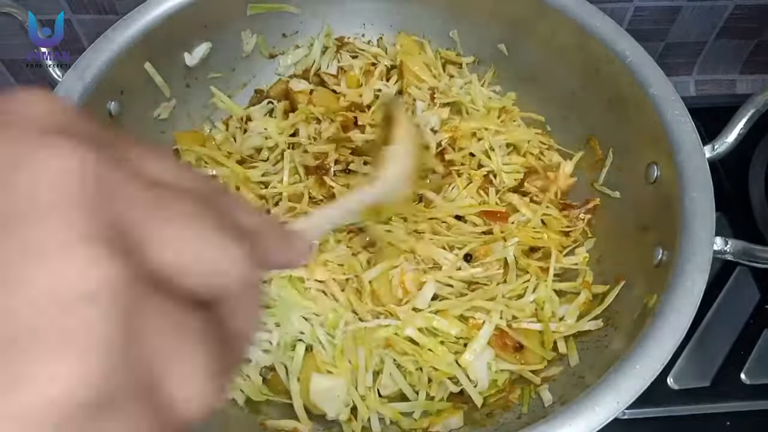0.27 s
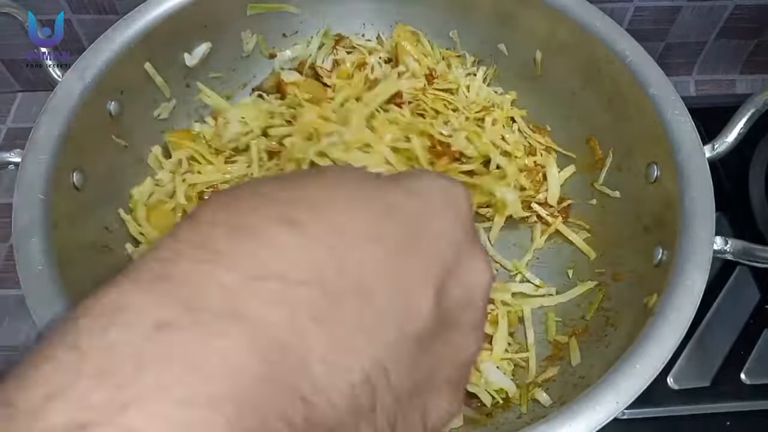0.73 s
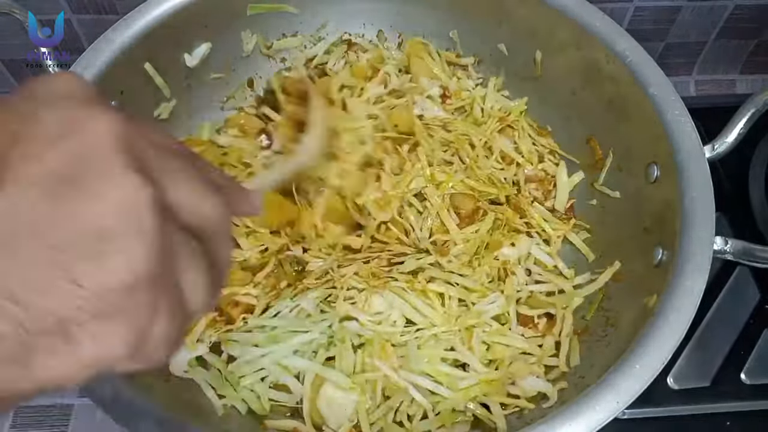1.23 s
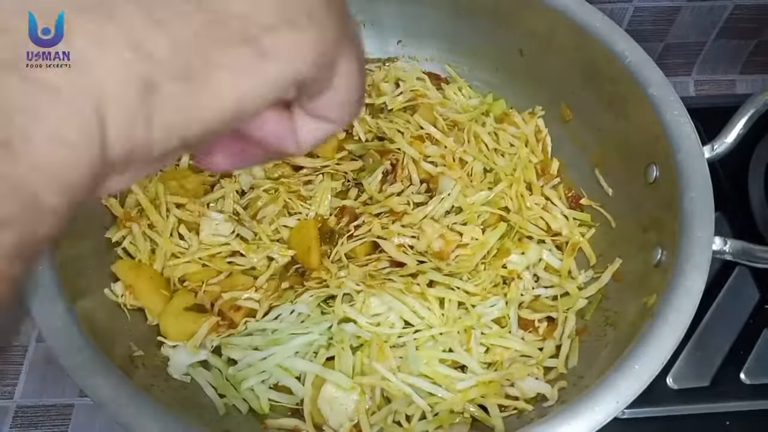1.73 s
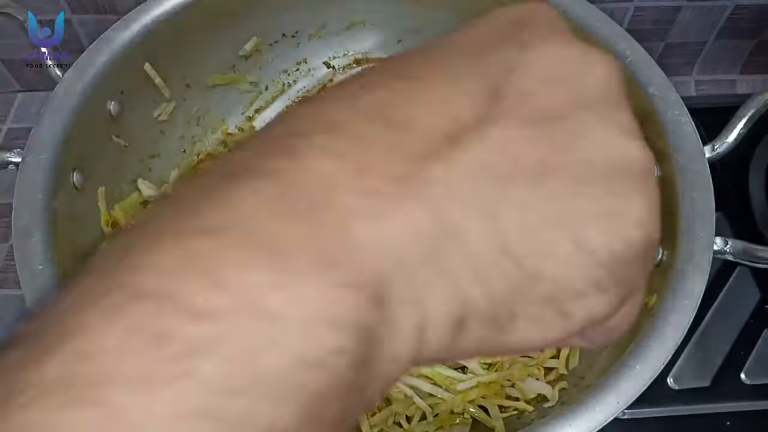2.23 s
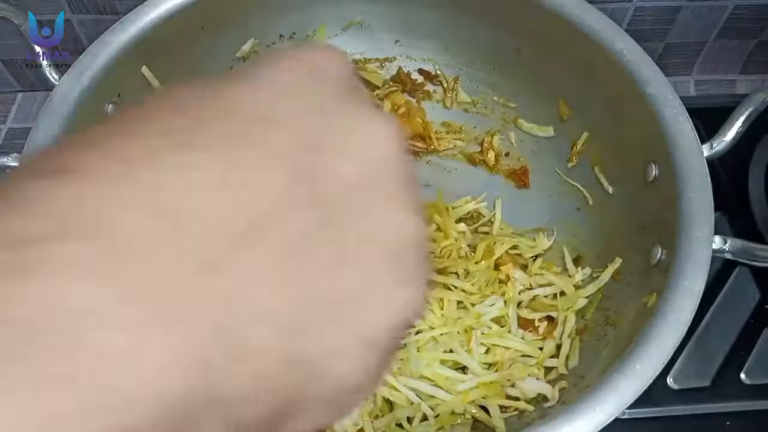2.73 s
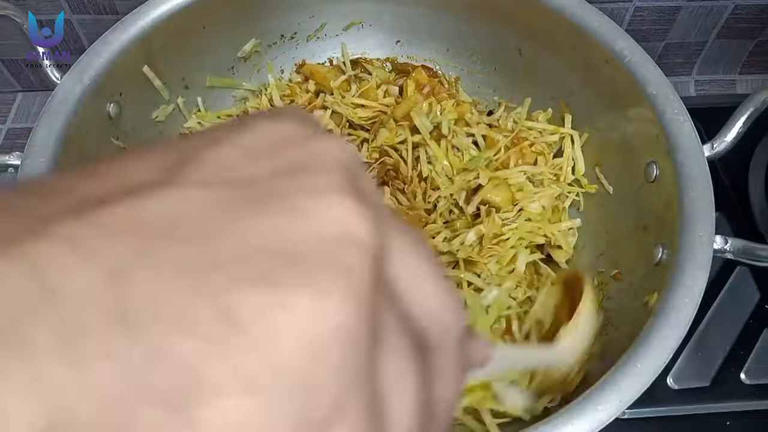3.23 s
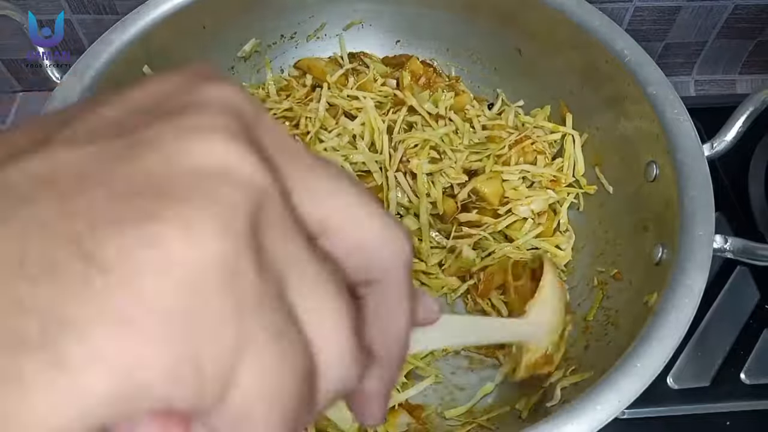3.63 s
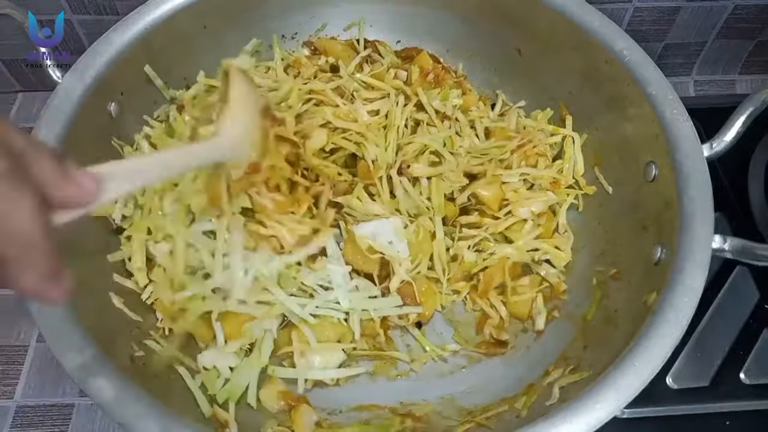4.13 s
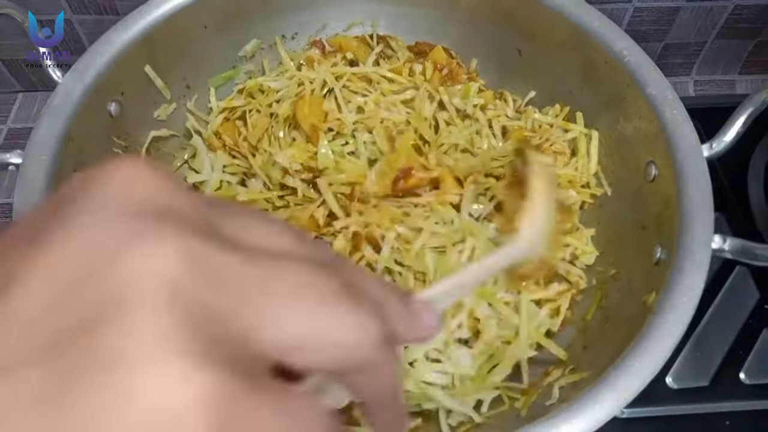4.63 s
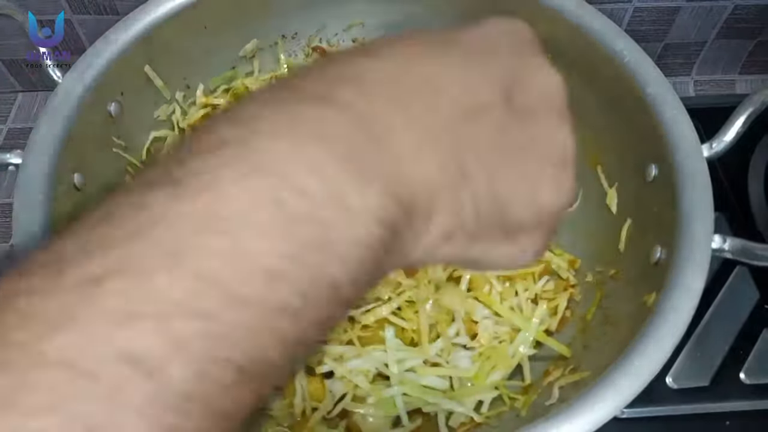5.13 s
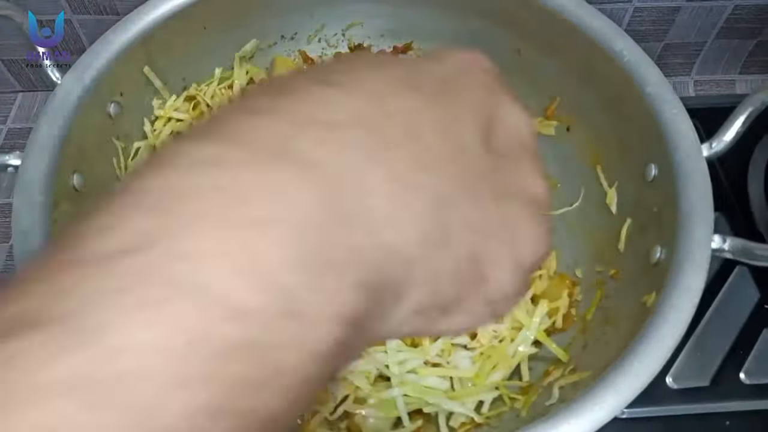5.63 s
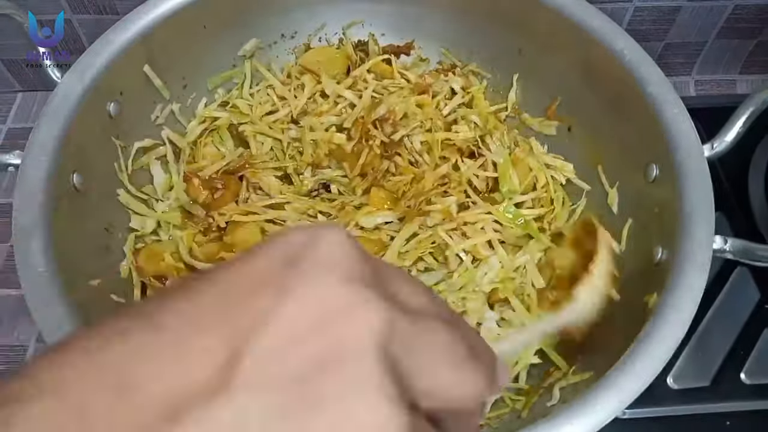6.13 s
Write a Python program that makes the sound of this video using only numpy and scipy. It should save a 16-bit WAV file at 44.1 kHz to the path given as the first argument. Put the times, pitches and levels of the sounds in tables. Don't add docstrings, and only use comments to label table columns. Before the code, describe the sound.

Close, dry wooden scraping and soft rustling of food in a metal pan, punctuated by bright clanks, small taps and dull thuds in a quiet kitchen.

```python
import sys
import numpy as np
from scipy import signal
from scipy.io import wavfile
from scipy.ndimage import uniform_filter1d

SR = 44100
rng = np.random.default_rng(int(sys.argv[2]) if len(sys.argv) > 2 else 0)


def generate_wav(signal):
    frames = np.transpose(np.atleast_2d(signal))
    scaled = np.clip(frames, -1, 1) * 32767
    pcm = np.round(scaled).astype(np.int16)
    wavfile.write(sys.argv[1], SR, pcm)


def invert_db(x):
    u = np.asarray(x, float) / 20
    return 10 ** u


N = 281954

# moment of most pressure in s, rise in s, fall in s, scrape level in dB,
# pitch of the patch of wall that sings in Hz.
STROKES = [(.03, 0.14, 0.22, -59.5, 3170), (.285, 0.093, 0.14, -59, 3040),
           (.515, 0.056, 0.048, -59.5, 3340), (1.14, 0.073, 0.06, -54, 3100),
           (1.33, 0.073, 0.13, -61.5, 4800), (1.64, 0.055, .06, -64, 4000),
           (1.748, 0.038, 0.057, -56, 2410), (2.79, 0.15, 0.16, -60.5, 3480),
           (3.045, 0.16, 0.14, -60, 2610), (3.35, 0.055, 0.087, -62.5, 7200),
           (3.46, 0.15, 0.077, -52, 4860), (3.905, 0.13, 0.078, -56.5, 5000), (3.98, 0.3, 0.097, -57, 3150),
           (4.4, 0.069, 0.092, -54, 4000), (4.625, 0.072, 0.099, -57.5, 4630),
           (4.88, 0.041, 0.12, -53.5, 4150), (4.97, 0.11, 0.13, -60.5, 4060),
           (5.39, 0.15, 0.24, -64.5, 4540), (5.59, 0.016, 0.15, -56, 6260),
           (5.66, 0.072, 0.09, -56.5, 5500), (5.78, 0.044, 0.26, -64.5, 3000),
           (6.04, 0.09, 0.16, -58, 3100), (6.28, 0.024, 0.082, -53, 5400)]
# [s, s, s, dB, Hz].
DRAGS = [
    (.825, 0.16, 0.11, -54, 3100),
    (1.0, 0.13, .1, -63.5, 4200),
    (2.03, 0.025, 0.15, -62, 3360),
    (2.08, 0.065, 0.047, -57, 2950),
    (2.43, 0.082, 0.2, -60.5, 2770),
    (2.55, 0.21, 0.18, -61.5, 4300),
    (5.18, 0.04, .1, -67, 2760),
]
# peak in s, rise in s, fall in s, level in dB.
SKIDS = [
    (.69, 0.0067, 0.018, -47),
    (2.03, 0.031, 0.03, -51.5),
    (2.08, .005, 0.055, -58),
    (2.385, 0.039, 0.032, -55.5),
    (5.14, 0.047, 0.11, -58),
]
# peak in s, rise in s, fall in s, level in dB.
TUMBLES = [(.03, 0.13, 0.11, -64.5), (.27, 0.14, 0.21, -60.5), (.75, 0.067, 0.15, -56),
           (1.11, 0.11, 0.085, -67), (1.34, .15, 0.34, -72.5), (1.75, 0.085, 0.087, -66.5),
           (2.08, 0.081, 0.13, -68.5), (2.44, 0.13, 0.21, -66), (2.89, 0.22, 0.032, -64.5),
           (2.98, 0.01, 0.055, -60.5), (3.055, 0.03, 0.032, -53), (3.4, 0.13, 0.25, -70.5),
           (3.88, 0.12, 0.017, -69), (3.95, 0.043, 0.16, -68.5), (4.1, 0.13, 0.26, -71),
           (4.39, 0.075, 0.092, -66.5), (4.62, 0.063, 0.059, -68.5), (4.92, 0.26, 0.15, -69.5),
           (5.19, 0.13, 0.053, -61), (5.39, .05, 0.17, -74), (5.6, 0.043, 0.13, -75),
           (5.69, 0.091, 0.041, -66.5), (5.77, .02, 0.081, -63.5), (5.98, 0.21, 0.068, -66.5),
           (6.055, 0.013, 0.043, -50), (6.3, 0.075, .04, -68)]
# frequency in Hz, density in dB per Hz.
SCRAPE_SPECTRUM = [(530, -44), (900, -2.5), (1230, -13.5), (1570, -13.5), (1810, -0.5), (2170, -4),
                   (2760, 1), (3590, -3.5), (5410, -1.5), (6480, 1.5), (7960, 0), (10100, -9), (14500, -10),
                   (16000, -8.5)]
# frequency in Hz, density in dB per Hz.
TUMBLE_SPECTRUM = [(71, -64), (120, -23.5), (273, 2), (484, -14), (585, 0), (658, -4.5), (1760, -4),
                   (2130, -17), (4000, -18), (5200, -34), (8800, -120)]

# start in s, slap peak in dB, crack below it in dB, crack t60 in s,
# share of the crack's tail in dB.
KNOCKS = [
    (0.678, -13, -3, 0.22, -8),
    (1.9735, -38, -29, 0.14, -17),
    (2.328, -23, -2, 0.34, -7),
    (5.0845, -16.5, -3, 0.23, -7),
]
# frequency in Hz, level in dB, t60 in s.
SLAP_MODES = [(1370, -3.5, .05), (3465, -3, .05), (4430, -1.5, .06)]
# frequency in Hz, density in dB per Hz.
CRACK_SPECTRUM = [(90, -55), (300, -10), (800, -21), (1400, -2), (2300, -2.5), (4500, -5), (5500, -9.5),
                  (6800, -17), (8000, -14), (10000, -24), (12000, -14), (16000, -34)]
PAN_HZ = [797, 1008, 1190, 1291, 1321, 1358, 1456, 1645, 1725, 2169, 2254, 2380, 2472, 2521, 2623, 2875,
          3323, 3427, 3462, 3495, 4091, 4393, 4432, 4750, 5098, 5170, 5445, 6015, 604, 832, 1157, 1555,
          3447, 3525, 5222, 5705, 7865, 8030, 8764, 10580, 11660, 13030]
# t60 in s, then level in dB in each of the four knocks.
BOWL_MODES = [(.18, -48, -64, -52, -52), (.4, -40, -76, -49, -43), (.31, -49, -77, -48, -52),
              (.24, -39, -61, -39, -43), (.24, -40, -60, -42, -43), (.28, -40, -70, -46, -42),
              (.07, -34, -59, -38, -37), (.24, -51, -66, -54, -49), (.1, -36, -64, -43, -40),
              (.13, -42, -62, -53, -46), (.19, -31, -63, -31, -30), (.24, -38, -56, -55, -41),
              (.08, -39, -47, -49, -42), (.08, -38, -48, -52, -44)]
# t60 in s, then level in dB in each knock.
RIM_MODES = [(.09, -43, -46, -48, -48), (.08, -38, -56, -45, -42), (.13, -40, -54, -47, -45),
             (.18, -41, -52, -34, -40), (.18, -28, -54, -60, -29), (.18, -41, -55, -48, -41),
             (.18, -47, -71, -57, -46), (.2, -39, -50, -51, -43), (.06, -33, -45, -46, -39),
             (.16, -50, -46, -52, -48), (.11, -39, -67, -62, -44), (.15, -42, -62, -59, -43),
             (.18, -49, -83, -71, -56), (.11, -49, -46, -65, -54)]
# t60 in s, then level in dB in each knock.
LIP_MODES = [(0.4, -92.0, -71.0, -69.0, -63.0), (0.24, -57.0, -59.0, -54.0, -52.0),
             (0.09, -48.0, -78.0, -41.0, -48.0), (0.24, -47.0, -78.0, -61.0, -50.0),
             (0.18, -44.0, -48.0, -40.0, -55.0), (0.4, -55.0, -74.0, -55.0, -58.0),
             (0.06, -33.0, -45.0, -50.0, -55.0), (0.18, -53.0, -59.0, -88.0, -58.0),
             (0.18, -54.0, -70.0, -86.0, -56.0), (0.18, -59.0, -74.0, -82.0, -57.0),
             (0.4, -75.0, -67.0, -90.0, -67.0), (0.4, -71.0, -72.0, -82.0, -76.0),
             (0.4, -69.0, -65.0, -84.0, -83.0), (0.18, -76.0, -65.0, -88.0, -74.0)]
# contact in s, level in dB.
CHATTER = [
    (1.7335, -55.5),
    (1.7378, -51.5),
    (1.7455, -66),
    (1.749, -55.5),
    (1.758, -54.5),
    (1.784, -66),
]
# frequency in Hz, level in dB, t60 in s.
CHATTER_MODES = [(1745, -4, .08), (1995, -4, .07), (2256, 0, .13), (2610, -8, .05), (4320, -6, .04),
                 (6800, -8, .03), (9050, -12, .03)]

# start in s, peak in dB, brightness in dB per octave, t60 in s,
# singing patch in Hz.
TAPS = [(0.814, -45, 12, 0.15, 8400), (1.629, -69, 8, 0.057, 8740), (1.6544, -83, 8, 0.033, 4770),
        (1.748, -62, 8, 0.14, 6800), (1.9744, -25, 2, 0.43, 2500), (2.0756, -39, -3, 0.19, 2510),
        (3.24, -27.5, -1.5, 0.21, 6380), (3.2888, -53, 8, 0.058, 6230), (3.8938, -35.5, -0.5, 0.039, 7630),
        (3.96, -51, 1, 0.16, 2900), (5.1115, -29.5, -1.5, 0.55, 3430), (5.579, -40, 9, 0.12, 6600),
        (5.651, -46, 7, 0.08, 6160), (6.27, -43, 3, 0.26, 5590)]
# frequency in Hz, density in dB per Hz.
EDGE_SPECTRUM = [(150, -10), (620, -4.5), (1200, -28), (1900, 2), (2650, 7), (3750, -15), (4600, 9),
                 (5400, -1), (6400, 3), (8300, 3.5), (10200, -9), (11500, -0.5), (12600, -9), (13800, -1),
                 (16000, -40)]
# start in s, peak in dB, brightness in dB per octave.
TICKS = [(.2675, -50, 0), (1.9748, -32, 5), (1.978, -32, 0.5), (2.0752, -40, -1.5), (3.038, -50, -3),
         (3.0407, -53, -10), (3.0747, -46, -7), (3.2441, -37, 3), (3.901, -50, 2), (3.918, -43, 2),
         (4.8375, -46, 2), (4.873, -44, 2), (4.887, -51, 8), (5.5845, -48, 2), (5.967, -51, -4),
         (6.0383, -47, -4), (6.043, -48, -5), (6.051, -50, -3), (6.2702, -44, -2), (6.278, -41, 2),
         (6.289, -51, -1), (6.318, -53, 2)]
# start in s, peak in dB, centre in Hz, t60 in s,
# width as a share of the centre.
THUDS = [(0.201, -53.5, 754, 0.77, 0.5), (1.056, -48, 392, 0.14, 0.87), (1.097, -54.5, 264, 0.42, 0.14),
         (1.98, -44, 570, 0.16, 1.8), (2.33, -44, 563, 0.15, 0.48), (2.872, -46, 630, 0.096, 1),
         (2.972, -46, 1470, 0.15, 0.63), (3.038, -36, 795, 0.088, 1.8), (3.242, -46.5, 555, 0.16, 1),
         (5.757, -51.5, 1180, 0.2, 1.2), (5.967, -48.5, 1450, 0.27, 1.5), (6.04, -33.5, 1130, 0.096, 1.4),
         (6.232, -55, 597, 0.36, 0.62), (5.585, -53.5, 900, 0.16, .45), (6.045, -48, 577, 0.28, 0.22),
         (3.04, -46.5, 1800, .15, 0.98), (6.041, -43, 2000, 0.14, 1.2), (3.055, -46, 900, 0.11, 1.5),
         (3.072, -45, 690, 0.087, 1), (6.272, -49, 624, 0.098, 0.78), (6.305, -61, 620, 0.074, 0.55)]

# frequency in Hz, gain in dB.
STOVE_RESPONSE = [(200, -1), (390, 6), (475, -3), (590, 2.5), (800, -0.5)]
# frequency in Hz, t60 in s.
KITCHEN_DECAY = [(200, 0.38), (1000, 0.32), (4000, 0.3), (12000, 0.033)]
# frequency in Hz, density in dB per Hz.
AIR_SPECTRUM = [(15, -26), (40, -23), (75, -56), (141, 1.5), (277, -5.5), (503, -8.5), (560, -17),
                (624, -17), (1190, -7.5), (1400, -13), (1790, -27), (2050, -11), (6380, -8.5),
                (12900, -15.5), (16000, -18.5)]
# frequency in Hz, width in Hz, level in dB.
FAN_TONES = [(563, 12, -81), (1780, 120, -81), (235, 30, -85)]
# start in s, length in s, pitch in Hz, level in dB, second partial in dB.
BIRD_NOTES = [
    (.07, .13, 1297, -79, 9),
    (1.46, .055, 1275, -77, -9),
    (1.51, .095, 1232, -68, -13),
    (1.6, .1, 1240, -79, 2),
    (1.71, .16, 1150, -76, -7),
    (4.055, .035, 1200, -78, -12),
    (4.08, .045, 1395, -71, -12),
    (4.125, .08, 1195, -76, -12),
]


def strokes():
    rows = STROKES + DRAGS
    pressure, rest = swells(rows), invert_db(2 * -70)
    total = pressure.sum(0) + rest
    patch_hz = stretched((np.transpose(rows)[4] @ pressure + rest * 4300) / total)

    slips = patchy(wall(coloured(grit(9000, 1.6), SCRAPE_SPECTRUM)), 2.2)
    treble = highpass(slips, 2, 5000, signal.sosfiltfilt)
    bright_db = -2.5 + 4 * np.log2(patch_hz / 4000)
    scrape = treble * invert_db(bright_db) + (slips - treble) * invert_db(-bright_db)
    patch = invert_db(-20.5) * evened(resonate(grit(11000, 0.37), patch_hz, 450))

    tumble = patchy(coloured(grit(12000, 1.1), TUMBLE_SPECTRUM), 2.0)
    heaps = swells(TUMBLES).sum(0) + invert_db(2 * -80)
    skid = evened(highpass(slips, 4, 7000))
    skid_power = swells(SKIDS).sum(0)
    return (stretched(np.sqrt(total)) * (scrape + patch)
            + stretched(np.sqrt(heaps)) * tumble
            + stretched(np.sqrt(skid_power)) * skid)


def swells(rows):
    s, rise, fall, db = np.transpose(rows)[:4, :, None]
    late = np.arange(0, N + 64, 64) / SR - s
    distance = np.maximum(-late / np.maximum(rise, .003), late / np.maximum(fall, .003))
    return invert_db(2 * (db - 15 * distance))


def stretched(coarse):
    return np.interp(np.arange(N), np.arange(len(coarse)) * 64, coarse)


def grit(per_s, spread_db):
    sign_draw, size_draw, event_draw = rng.random((3, N))
    size = invert_db(-spread_db * np.log(size_draw + 0.0043))
    return np.sign(sign_draw - .5) * size * (event_draw < per_s / SR)


def patchy(x, patch_db):
    z = signal.stft(x, nperseg=256)[2]
    field = uniform_filter1d(rng.standard_normal(z.shape), size=4, axis=0)
    field = evened(uniform_filter1d(field, size=12, axis=1))
    return evened(signal.istft(z * invert_db(patch_db * field), nperseg=256)[1][:N])


def wall(x):
    block, hop = 8192, 4096
    t, fade = np.arange(SR // 10) / SR, np.hanning(block)
    padded = np.pad(x, (hop, block))
    spread = np.zeros(len(padded) + SR)
    for at in range(0, len(x) + hop, hop):
        shimmer = burst(t, 0.045, 0.0008)
        shimmer = shimmer / np.linalg.norm(shimmer)
        add(spread, at / SR, signal.fftconvolve(fade * padded[at:at + block], shimmer))
    return x + invert_db(1) * spread[hop:][:len(x)]


def knocks():
    out, t = np.zeros(N), np.arange(SR // 3) / SR
    t60, *levels = np.transpose(BOWL_MODES + RIM_MODES + LIP_MODES)
    for (s, db, crack_db, crack_t60, tail_db), mode_db in zip(KNOCKS, levels):
        tail = invert_db(tail_db) * burst(t, crack_t60, 0.00093)
        crack = coloured(burst(t, 0.012, 0.00008) + tail, CRACK_SPECTRUM)
        slap = peaked(ring(*np.transpose(SLAP_MODES), t)) + invert_db(crack_db) * peaked(crack)
        pan = ring(PAN_HZ, mode_db, t60, t)
        add(out, s - .0005, invert_db(db - 9) * slap + invert_db(0.14) * pan)
    add(out, 2.0745, invert_db(-12) * ring(PAN_HZ, levels[1], t60, t))
    for s, db in CHATTER:
        add(out, s - .0005, invert_db(db) * ring(*np.transpose(CHATTER_MODES), t))
    return out


def ring(hz, db, t60, t):
    hz, db, t60 = np.array([hz, db, t60])[:, :, None]
    fall_db = 60 * t / np.clip(t60, .03, .4)
    ragged = rng.standard_normal((len(hz), len(t)))
    for _ in range(2):
        ragged = uniform_filter1d(ragged, size=400)
    ragged_db = 1.8 * evened(ragged) * np.minimum(t / .04, 1)
    damped_db = -8 * (hz > 1100) * np.clip((t - .058) / .01, 0, 1)
    decay = invert_db(db - fall_db) + invert_db(db - 24 - fall_db / 2)
    modes = decay * invert_db(damped_db + ragged_db) * np.sin(2 * np.pi * hz * t)
    return modes.sum(0) * (1 - np.exp(-t / .0011))


def taps():
    out, t = np.zeros(N), np.arange(SR // 4) / SR
    for s, db, tilt_db, t60, hz in TAPS:
        patch_db = 3 - 0.81 * (db + 45)
        tail = coloured(wall(burst(t, t60, .001)), [(20, 0), (20000, 0)], 1.5)
        click = burst(t, 0.014, 0.000067) + invert_db(-20) * tail
        click = coloured(click, EDGE_SPECTRUM, np.clip(tilt_db, -2, 8))
        patch = resonate(burst(t, 0.61 * t60, 0.00026), hz, 250)
        add(out, s - .0005, invert_db(db - 8.0) * (peaked(click) + invert_db(patch_db) * peaked(patch)))
    return out


def ticks():
    out, t = np.zeros(N), np.arange(SR // 20) / SR
    for s, db, tilt_db in TICKS:
        click = coloured(burst(t, .014, 0.00018), SCRAPE_SPECTRUM, tilt_db)
        add(out, s - .0005, invert_db(db) * peaked(click) / 2)
    return out


def thuds():
    out, t = np.zeros(N), np.arange(SR // 3) / SR
    for s, db, hz, t60, share in THUDS:
        band = evened(resonate(rng.standard_normal(len(t)), hz, share * hz))
        envelope = invert_db(-60 * t / t60) * (1 - np.exp(-t / 0.0018))
        add(out, s - .0005, invert_db(db - 9.0) * band * envelope)
    return out


def kitchen(x):
    echoes = np.zeros(SR // 2)
    at = np.arange(140, SR // 2 - 20, 20)
    echoes[at + rng.integers(0, 20, len(at))] = rng.choice([-1., 1.], len(at))
    hz, t, z = signal.stft(echoes, SR, nperseg=256)
    decay = invert_db(-60 * t / read(KITCHEN_DECAY, hz)[:, None])
    tail = signal.istft(z * decay, SR, nperseg=256)[1]
    return signal.fftconvolve(x, tail / np.linalg.norm(tail))[:N]


def air():
    frames, hz = N // 256 + 5, np.fft.rfftfreq(1024, 1 / SR)
    real, imaginary, patches = rng.standard_normal((frames, 513, 3)).T
    patches = uniform_filter1d(patches, size=12, axis=0)
    patches = evened(uniform_filter1d(patches, size=10, axis=1))
    z = (real + 1j * imaginary) * invert_db(read(AIR_SPECTRUM, hz)[:, None] + 0.15 * patches)
    hiss = evened(signal.istft(z, nperseg=1024, noverlap=768)[1][:N])
    crackle = evened(coloured(grit(1400, 1.5), SCRAPE_SPECTRUM))
    return invert_db(-67) * (hiss + invert_db(-14.0) * crackle)


def fan():
    noise = rng.standard_normal(N)
    return sum(invert_db(db) * evened(resonate(noise, hz, width)) for hz, width, db in FAN_TONES)


def birds():
    out = np.zeros(N)
    for s, length, hz, db, second_db in BIRD_NOTES:
        t = np.arange(0, length, 1 / SR)
        waver = evened(uniform_filter1d(rng.standard_normal(len(t)), size=300))
        sagging_hz = hz - 290 * (t - length / 2)
        phase = 2 * np.pi * np.cumsum(sagging_hz * (1 + .008 * waver)) / SR
        call = np.sin(phase) + invert_db(second_db) * np.sin(2 * phase)
        add(out, s, np.sqrt(2) * invert_db(db) * call * signal.windows.tukey(len(t), 0.29))
    return out


def burst(t, t60, rise):
    return rng.standard_normal(len(t)) * invert_db(-60 * t / max(t60, .005)) * (1 - np.exp(-t / rise))


def resonate(x, hz, width):
    turn = np.exp(2j * np.pi * np.cumsum(hz * np.ones(len(x))) / SR)
    r = np.exp(-np.pi * width / SR)
    for _ in range(2):
        x = 2 * (turn * signal.lfilter([1 - r], [1, -r], x / turn)).real
    return x


def coloured(x, points, tilt_db=0.0):
    hz = abs(np.fft.fftfreq(2048, 1 / SR))
    gain_db = read(points, hz) + tilt_db * np.log2((hz + 50) / 3000)
    log_gain = np.log(invert_db(np.maximum(gain_db, -100)))
    impulse = np.fft.ifft(np.exp(np.conj(signal.hilbert(log_gain)))).real
    return signal.oaconvolve(x, impulse[:1024])[:len(x)]


def highpass(x, order, hz, run=signal.sosfilt):
    return run(signal.butter(order, hz, "high", fs=SR, output="sos"), x)


def read(points, hz):
    f, value = np.transpose(points)
    return np.interp(np.log(hz + 1), np.log(f + 1), value)


def evened(x):
    return x / np.sqrt(np.mean(x ** 2) + 1e-20)


def peaked(x):
    return x / (3 * np.sqrt(np.mean(x[:441] ** 2)))


def add(mix, s, sound):
    part = mix[round(s * SR):][:len(sound)]
    part += sound[:len(part)]


def scene():
    rings, far = highpass(knocks(), 2, 200), birds()
    hits = highpass(taps() + thuds() + ticks(), 4, 240)
    wet = kitchen(invert_db(-16) * rings + invert_db(-10) * far) + invert_db(-10) * kitchen(hits)
    blows = coloured(rings + hits + wet, STOVE_RESPONSE)
    return (strokes() + blows + air() + fan() + far)[None]


def roll_off(x):
    return signal.sosfilt(signal.butter(12, 16450, fs=SR, output="sos"), x)


def record(dry):
    edge = signal.firwin(1023, 15560, window=("kaiser", 9), fs=SR)
    mix = signal.oaconvolve(dry, edge[None], "same")
    return roll_off(mix)


dry = scene()
out = record(dry)
generate_wav(out)
```